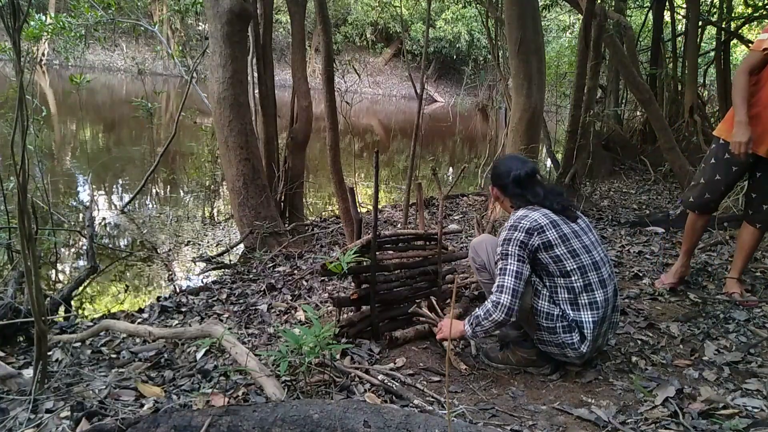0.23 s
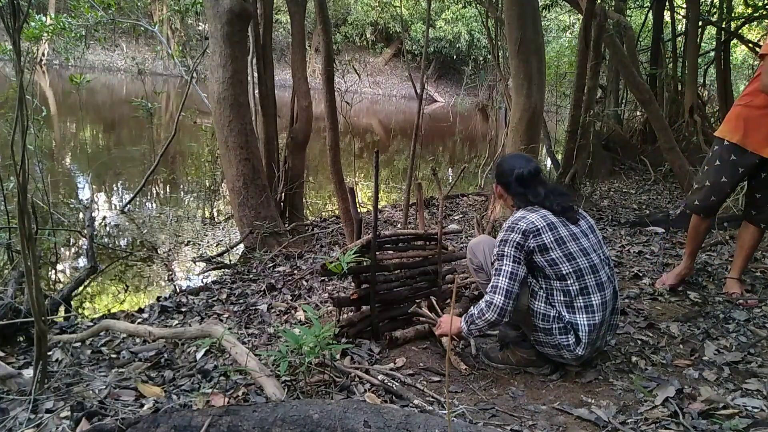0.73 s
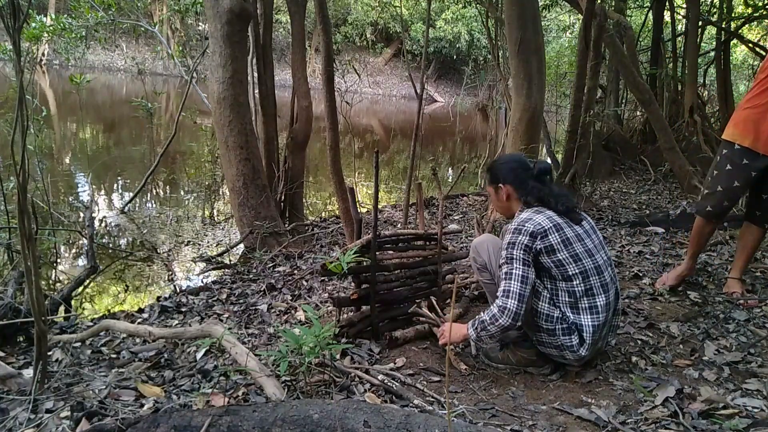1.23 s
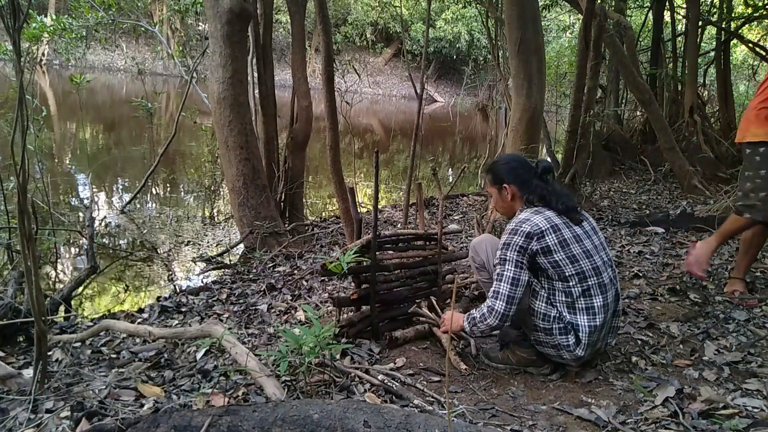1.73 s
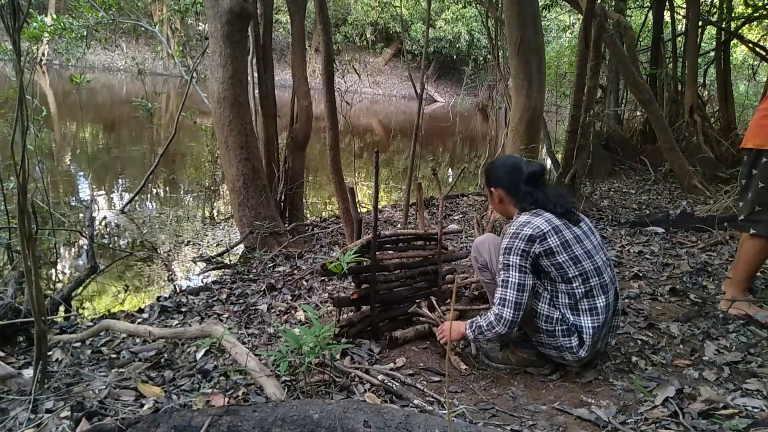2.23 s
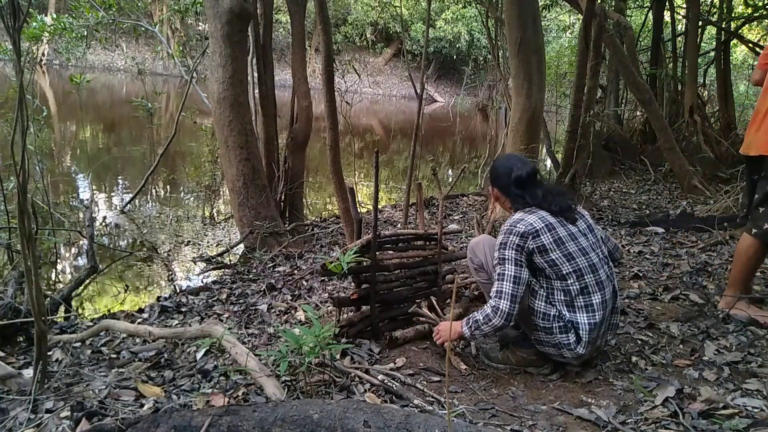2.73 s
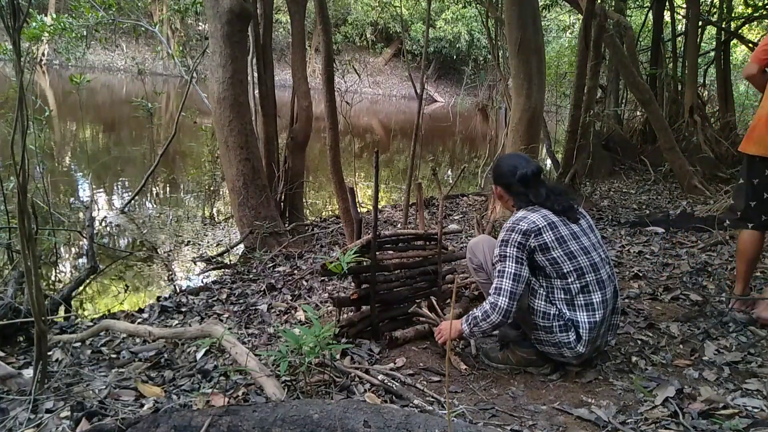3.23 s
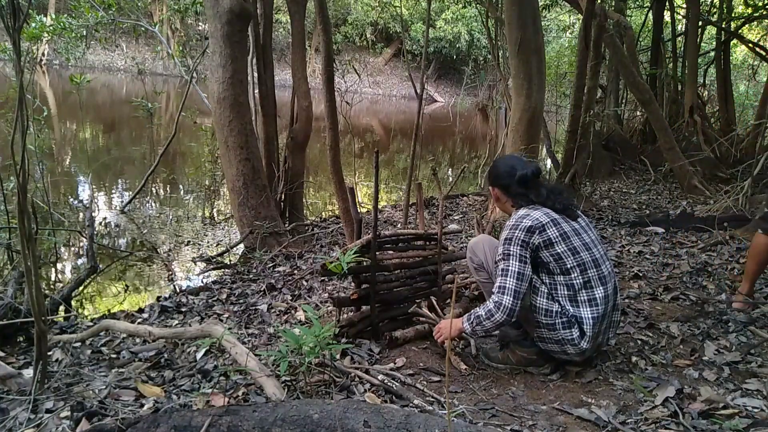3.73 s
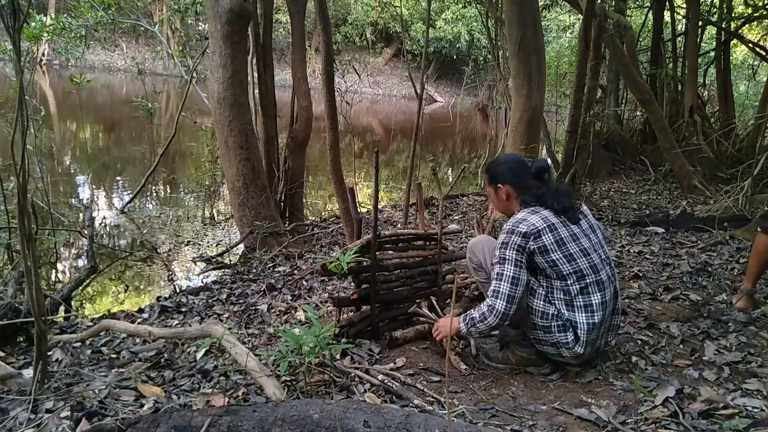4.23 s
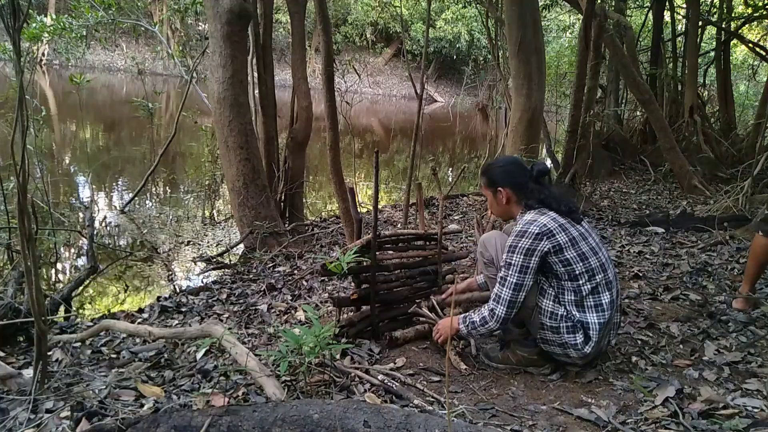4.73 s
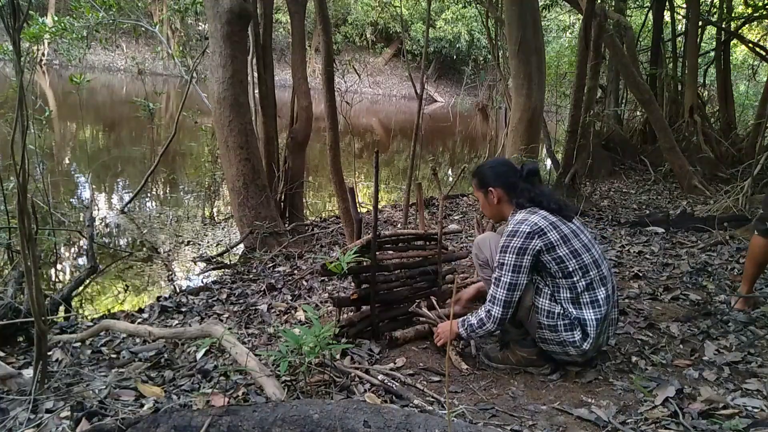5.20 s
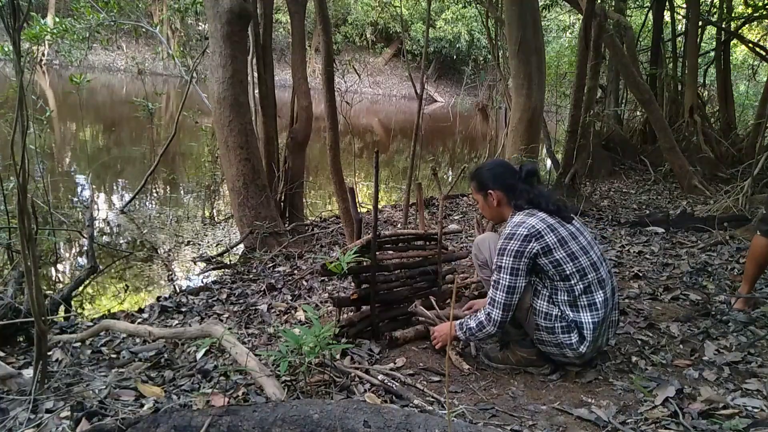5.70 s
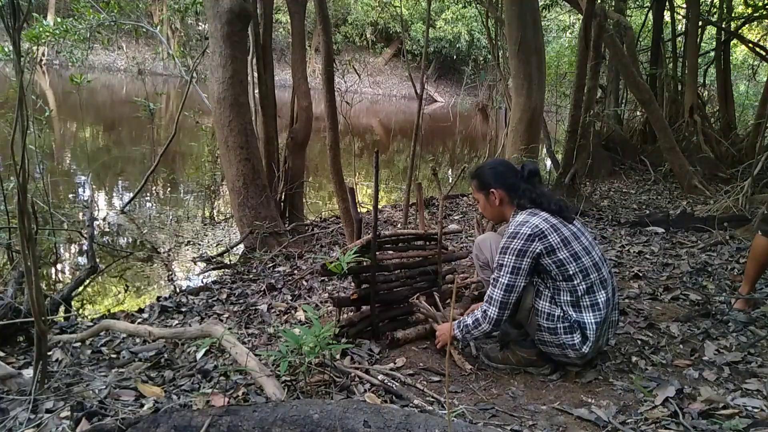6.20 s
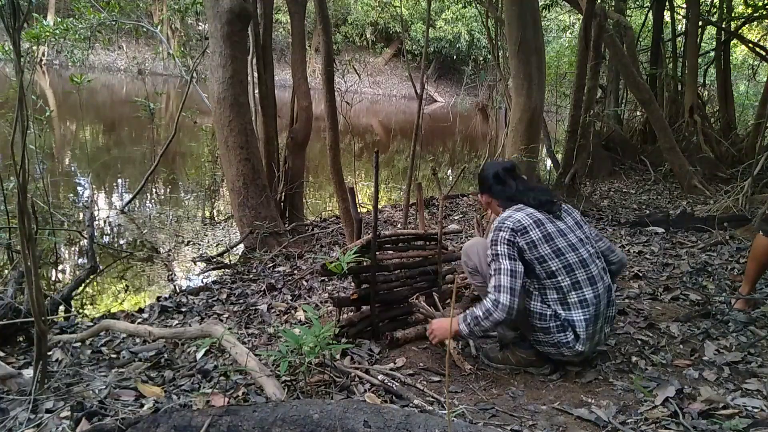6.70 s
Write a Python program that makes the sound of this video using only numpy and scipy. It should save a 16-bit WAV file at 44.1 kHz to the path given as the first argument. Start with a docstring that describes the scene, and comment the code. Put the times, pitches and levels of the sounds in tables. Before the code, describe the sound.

Brittle kindling is broken and pushed through leaf litter, heard close by a small, bright microphone. Dry snaps of uneven strength stand out among tiny clicks, scraping wood and crinkling leaves. Loudest cracks fall just after the middle, then the handling calms into sparse ticks before another snap near the end. The open woodland is quiet, with steady hush, short diffuse echo, a brief high whine early on and weak distant bird notes later.

```python
"""Dry twigs snap on a forest floor: each fracture is an impulse amid a burst of random-sign fibre clicks.
Smaller fractures tick; sticks clack as damped resonances, shake a wood pile and ring in bending modes.
Between them grains of filtered noise scrape wood and rustle dead leaves in strokes.
Behind: air as steady coloured noise, an insect whine and far bird notes as sines of wandering pitch.
Tails of decaying noise stand for the echo among the trunks."""
import sys
import numpy as np
from scipy import signal
from scipy.fft import rfft, irfft, next_fast_len
from scipy.io import wavfile
from scipy.ndimage import map_coordinates

SR = 44100
rng = np.random.default_rng(int(sys.argv[2]) if len(sys.argv) > 2 else 0)


def wav_record(signal):
    """Record a signal, one row per channel, as 16-bit PCM in the file named by sys.argv[1]."""
    frames = np.transpose(np.atleast_2d(signal))
    bounded = np.clip(frames, -1, 1)
    # unit amplitude maps onto the largest positive 16-bit level
    quanta = np.round(bounded * 32767).astype(np.int16)
    wavfile.write(sys.argv[1], SR, quanta)


N = 306495

# Twigs breaking: t/s, level/dB, body level/dB, top treble/dB, tearing time before the break/s, splintering t60/s
TWIG_SNAPS = [(-.012, -31, -24, 0, 0.0013, 0.084), (1.229, -30, -24, -3.5, 0.0009, .016),
              (1.7513, -34, -29, -0.5, 0.0035, 0.04), (1.9322, -20.5, -21.5, 2.5, .0034, 0.053),
              (3.5606, -35.5, -31, 4.5, 0.00072, 0.029), (3.7505, -22, -9, 5.5, 0.00072, 0.014),
              (4.09, -37.5, -15, 10.5, 0.0043, 0.054), (4.2376, -23.5, -24, -4, 0.00061, 0.053),
              (4.3658, -15, -14, 2.5, 0.00029, 0.023), (6.425, -25.5, -22.5, -1.5, 0.0015, 0.091)]
# Twig ends ticking together: t/s, level/dB, body level/dB, top treble/dB, splintering t60/s
TWIG_TICKS = [(.172, -48, -4.5, -7, 0.026), (0.3452, -39.5, -9, -9, .025), (0.4034, -39, -20, -17, .013),
              (0.5172, -43.5, -19, 1, 0.023), (0.5949, -39.5, -20, -1, .012),
              (1.032, -30.5, -24, -7, 0.011), (1.3238, -41, -11, -6, 0.011), (1.8808, -40.5, -35, 4, 0.04),
              (2.133, -41.5, -3, 5, .02), (2.1897, -36, -9, 1, .011), (2.6043, -28.5, -45, -7, 0.02),
              (2.6423, -36, -10.5, -12, 0.033), (2.8078, -40, -7, -26, 0.015),
              (2.9636, -31, -13, -16, 0.0054), (3.144, -43, -11, -13, .015), (3.1739, -43, -15, -13, 0.017),
              (3.2335, -31.5, -13.5, -8, .016), (3.2997, -28, -35, -10.5, 0.015), (3.494, -46, -7, 1, .008),
              (4.0556, -34, -40, -1.5, 0.025), (4.0806, -32, -29, -3, .026),
              (4.4741, -28.5, -20, -10, 0.012), (4.77, -38.5, -17, -20, 0.025),
              (4.8674, -33.5, -19, -24, 0.027), (4.9688, -39, -20, -5.5, 0.03),
              (5.0907, -38.5, -21, -14, .03), (5.1288, -32, -38, -10, .008),
              (5.219, -37.5, -7.5, -3.5, 0.0087), (5.25, -42, -26, -2, 0.012),
              (5.3569, -38.5, -6.5, -7, 0.0085), (5.4458, -35.5, -11, -19, .008),
              (5.94, -49, -24, -2, .016), (6.141, -49, -4.5, -1, 0.073), (6.375, -46, -30, 4.5, 0.055),
              (6.5797, -44, -12.5, -1, .024), (6.6053, -38, -13.5, -16, 0.033),
              (6.712, -44.5, -12, -10, 0.044), (6.8759, -43.5, -15, -14, 0.049)]
# Light sticks bumping: t/s, level/dB, f/Hz, t60/s
STICK_BUMPS = [(.171, -68, 1440, 0.028), (.518, -66.5, 1350, 0.019), (.561, -67, 1560, 0.042),
               (1.753, -60, 990, 0.029), (1.939, -62.5, 1240, 0.2), (1.981, -57, 990, 0.09),
               (2.046, -56.5, 1070, 0.14), (2.08, -61, 840, 0.03), (2.111, -57.5, 1210, 0.081),
               (2.187, -43, 1640, 0.0049), (2.431, -64.5, 1200, 0.1), (3.869, -68, 754, 0.048),
               (4.439, -60, 1580, 0.042), (4.769, -61.5, 1420, .025), (4.971, -65, 1030, 0.021),
               (5.091, -59.5, 1760, 0.044), (5.195, -58, 2000, 0.037), (5.226, -59.5, 950, 0.06),
               (5.809, -69, 965, 0.042)]
# A thick stick landing on the pile and bouncing: t/s, level/dB
PILE_KNOCKS = [(3.3675, -48), (3.379, -46.5)]
# Bending modes of the thick stick: f/Hz, level/dB, t60/s
BENDING_MODES = [(440, 2.5, 0.29), (552, 11.5, 0.098), (620, 1, 0.07), (815, 12, 0.13), (960, -2, 0.13),
                 (1344, 6, 0.077), (1457, 5, 0.055)]
# Far bird notes: t/s, f/Hz, level/dB
BIRD_NOTES = [(4.67, 2477, -66), (4.87, 2430, -63), (5.01, 2590, -63), (5.211, 2310, -65),
              (5.41, 2400, -66.5), (5.595, 2594, -62.5), (5.719, 2490, -62), (5.865, 2520, -63.5)]
# Relative spectra of break, twig body, wood scrape, leaves and air: f/Hz, density/dB per Hz
CRACK_SPECTRUM = [(2000, -30.5), (4800, -15.5), (6500, -6.5), (9000, -2), (12000, -1.5), (16000, 4)]
BODY_SPECTRUM = [(40, -4), (120, 2), (300, 0.5), (650, 0), (1100, -2), (2000, 0.5), (2900, 5), (4500, -2),
                 (8000, -10)]
SCRAPE_SPECTRUM = [(80, -3.5), (300, -8.5), (600, 1.5), (1400, 1), (3000, -6.5), (5000, -14.5),
                   (9000, -19.5)]
LEAF_SPECTRUM = [(1000, -11.5), (3000, -2), (5000, -4), (7500, 1), (10000, -1.5), (16000, 0)]
AIR_SPECTRUM = [(10, 28), (25, 13.5), (60, 7.5), (130, 6), (300, -2), (1000, -4.5), (2500, -8), (5500, -18),
                (7800, -23), (9400, -3), (10400, -15), (16000, -16)]
# Decay of the forest echo: f/Hz, t60/s
FOREST_DECAY = [(200, 0.13), (2500, 0.26), (8000, 0.33), (15000, 0.27)]
# Treble resonances of the microphone: f/Hz, width/Hz, level/dB
MICROPHONE_PEAKS = [(7830, 656, 7.5), (15050, 1100, 5.5)]
# Gain of the side signal: f/Hz, level/dB
SIDE_GAIN = [(3950, -69), (4300, -0.5), (6500, -7.5), (8000, -18), (15000, -10)]
# Resonances of the wood pile: f/Hz, width/Hz, level/dB
PILE_MODES = [(285, 51, -14), (425.5, 23, -6), (735, 160, -8), (1425, 96, -8.5), (2140, 1800, -22.5)]
# Gains of a close, direct sound: one row for mid, one for side
DIRECT_GAINS = [
    [1],
    [.4],
]
# Sticks pushed through litter: t/s of the hardest push, rise/s, fade/s, scraping wood level/dB, leaf level/dB
LITTER_STROKES = [(.31, .04, 0.094, -67, -60.5), (.6, 0.3, 0.24, -74, -63.5), (1.07, 0.18, .4, -72, -65),
                  (1.58, 0.26, 0.52, -65, -65), (2.12, 0.31, 0.19, -58, -50.5),
                  (2.66, 0.46, 0.32, -58, -53), (2.919, 0.16, 0.12, -64.5, -60.5),
                  (3.27, 0.49, 0.85, -63, -59), (3.35, 0.13, 0.11, -52, -47.5),
                  (4.097, 0.052, 0.11, -59, -50), (4.7, 1, 0.87, -66.5, -69.5),
                  (5.07, 0.5, 0.46, -76.5, -61), (5.38, .08, 0.093, -61.5, -62.5),
                  (5.81, 0.24, 0.18, -71, -67.5), (6.17, .05, 0.18, -72.5, -65),
                  (6.63, 0.13, 0.18, -78, -64.5), (6.85, 0.24, 0.2, -86, -66.5)]

TOP_HZ = 15850  # upper band limit
LEAD_S, BREAK_DB = .04, 4  # time kept for tearing before a break; level of the break's single impulse
TICK_TEAR_S = 0.00019  # tearing time before every tick
STRAY_DB, STRAY_SPREAD_DB = 5, 4  # fainter ticks, relative to the stirring of the leaves
# the pile's thud under a 1 kHz stick; lighter, higher sticks shake it less
THUD_DB, THUD_DB_PER_OCTAVE = -11.5, -17
STROKE_RANGE_DB = 17.5  # a stroke gains this much over its rise and loses it over its fade
RESTING_WOOD_DB, RESTING_LEAVES_DB = -78, -78.5  # the litter is never quite still
# bits shower on the leaves after a snap; dB relative to the snap's level
DEBRIS_DB, DEBRIS_RISE_S, DEBRIS_FADE_S = -35.5, 0.009, 0.52
NOTE_S, NOTE_FALL_HZ = .115, 255  # length and fall in pitch of every bird note
WHINE_START_S, WHINE_END_S, WHINE_FADE_S, WHINE_DB = 1.17, 2.0, 0.11, -73
WHINE_HZ, WHINE_SAG_HZ, WHINE_SETTLE_S = 7500, 645, 0.32  # it starts sharp and settles onto WHINE_HZ


def amp(db):
    """Amplitude ratio of a level in dB."""
    return 10 ** (np.asarray(db) / 20)


def unit(x):
    """Normalisation to rms 1."""
    return x / np.sqrt(np.mean(x ** 2) + 1e-20)


def along(points, hz):
    """Interpolation of (f/Hz, value) points on a logarithmic frequency axis."""
    f, value = np.transpose(points)
    return np.interp(np.log(hz + 1), np.log(f), value)


def wobble(rate):
    """A smooth random curve through normal deviates, rate knots a second."""
    knots = rng.standard_normal(int(N * rate / SR) + 4)
    return map_coordinates(knots, [np.arange(N) * rate / SR])


def filtered(x, response):
    """Linear filtering: the spectrum of x times a response of frequency."""
    n = x.shape[-1]
    padded = next_fast_len(n + 2 ** 12)
    spectrum = rfft(x, padded) * response(np.fft.rfftfreq(padded, 1 / SR))
    return irfft(spectrum, padded)[..., :n]


def coloured(x, spectrum):
    """Spectral shaping of x, normalised to rms 1."""
    return unit(filtered(x, lambda hz: amp(along(spectrum, hz))))


def tinted(x, spectrum):
    """Spectral shaping that leaves the power of a white x unchanged."""
    return filtered(x, lambda hz: unit(amp(along(spectrum, hz))))


def resonance(hz, centre_hz, q):
    """Response of one damped mode, about 1 at its centre."""
    return 1 / (1 + 1j * q * (hz / centre_hz - centre_hz / (hz + 1)))


def noise(size):
    """Independent white noise in mid and side."""
    return rng.standard_normal((2, size))


def add(track, s, sound):
    """Superposition of a sound on the track from time s, cut at the track's ends."""
    start = round(s * SR)
    room = track[:, max(start, 0):]
    sound = sound[..., max(-start, 0):]
    room[:, :sound.shape[-1]] += sound[..., :room.shape[-1]]


def forest():
    """Diffuse scattering: trunks and leaves turn a click into a tail, mid energy 1, new at every call."""
    hz, t, bands = signal.stft(noise(SR // 2), SR, nperseg=256)
    decay = amp(-60 * t / along(FOREST_DECAY, hz)[:, None])
    tail = signal.istft(bands * decay, SR, nperseg=256)[1][:, :SR // 2]
    return tail / np.linalg.norm(tail[0])


def echo(x):
    """Reverberation: the mid of a sound convolved with the forest's impulse response."""
    return signal.fftconvolve(x[:1], forest(), axes=1)[:, :x.shape[-1]]


def air():
    """The steady hush of the forest: stationary noise of fixed spectrum."""
    return amp(-63) * coloured(noise(N), AIR_SPECTRUM) * [[1], [.3]]


def insect():
    """Frequency modulation: a thin, unsteady whine whose pitch sinks a little."""
    t = np.arange(N) / SR
    age = np.maximum(t - WHINE_START_S, 0)
    singing = np.clip(np.minimum(age, WHINE_END_S - t) / WHINE_FADE_S, 0, 1)
    hz = WHINE_HZ + WHINE_SAG_HZ * np.exp(-(age / WHINE_SETTLE_S) ** 2)
    whine = np.sin(2 * np.pi * np.cumsum(hz + 150 * wobble(700)) / SR)
    return singing * amp(WHINE_DB + 2.4 * wobble(60)) * whine


def bird():
    """Falling notes, raspy by random frequency modulation and blurred by scattering."""
    out = np.zeros((2, N))
    u = np.linspace(0, 1, int(NOTE_S * SR))
    envelope = np.sqrt(np.abs(np.sin(np.pi * u)))
    for s, hz, db in BIRD_NOTES:
        pitch = hz + NOTE_FALL_HZ * (.5 - u) + 230 * wobble(445.0)[:len(u)]
        note = np.sin(2 * np.pi * np.cumsum(pitch) / SR)
        add(out, s, amp(db) * envelope * note)
    return .45 * out + .8 * echo(out)


def swell(s, rise_s, fade_s):
    """Exponential growth to a gain of 1 at time s and exponential decay after it."""
    t = np.arange(N) / SR - s
    return amp(-STROKE_RANGE_DB * np.minimum(np.maximum(-t / rise_s, t / fade_s), 10))


def stirring():
    """Incoherent addition: gains of wood and leaves, strokes and falling debris summed in power."""
    wood, leaves = amp(RESTING_WOOD_DB) ** 2, amp(RESTING_LEAVES_DB) ** 2
    for s, rise_s, fade_s, wood_db, leaves_db in LITTER_STROKES:
        push = swell(s, rise_s, fade_s)
        wood = wood + (amp(wood_db) * push) ** 2
        leaves = leaves + (amp(leaves_db) * push) ** 2
    for s, db, *_ in TWIG_SNAPS:
        debris = swell(s + DEBRIS_RISE_S, DEBRIS_RISE_S, DEBRIS_FADE_S)
        leaves = leaves + (amp(db + DEBRIS_DB) * debris) ** 2
    return np.sqrt(wood), np.sqrt(leaves)


def grains(rate, spread_db, hiss):
    """Stick-slip friction: tiny slips of varied size, rate a second, over a smooth rub."""
    size = amp(spread_db * np.minimum(rng.exponential(size=N), 3))
    slips = np.sign(noise(N)) * size * (rng.random(N) < rate / SR)
    return unit(slips) + hiss * noise(N)


def shuffle():
    """Friction noise: sticks drag over the ground and dead leaves crinkle under them."""
    wood_gain, leaves_gain = stirring()
    rub = coloured(grains(rate=700, spread_db=2.0, hiss=0.99), SCRAPE_SPECTRUM)
    crinkle = coloured(grains(rate=1400, spread_db=5.0, hiss=1.18), LEAF_SPECTRUM)
    scrape = wood_gain * amp(3.56 * wobble(60)) * rub
    leaves = leaves_gain * amp(2.2 * wobble(58)) * crinkle
    return scrape + leaves


def knocks():
    """Modal vibration: the thick stick rings in its bending modes at each contact."""
    out, t = np.zeros((2, N)), np.arange(SR // 2) / SR
    for s, db in PILE_KNOCKS:
        ring = sum(amp(level - 60 * t / t60) * np.sin(2 * np.pi * hz * t) for hz, level, t60 in BENDING_MODES)
        contact = amp(1.0 - 60 * t / 0.054) * coloured(noise(len(t)), SCRAPE_SPECTRUM)
        add(out, s, amp(db) * (ring + contact))
    # even a thick stick is slender and radiates little bass
    return filtered(out, lambda hz: (1j * hz / (250 + 1j * hz)) ** 3 / np.sqrt(1 + (340 / (hz + 1)) ** 8))


def pile(hz):
    """Modal superposition: the wood pile's response, its modes alternating in sign."""
    return sum((-1) ** k * amp(db) * resonance(hz, centre, centre / width)
               for k, (centre, width, db) in enumerate(PILE_MODES))


def bumps():
    """Coupled resonators: light sticks clack at their own pitch and shake the pile they touch."""
    out, t = np.zeros((2, N)), np.arange(SR // 3) / SR
    for s, db, pitch_hz, t60 in STICK_BUMPS:
        rattle = noise(len(t)) * amp(db - 60 * t / t60)
        clack = filtered(rattle, lambda hz: unit(resonance(hz, pitch_hz, q=2.25) * (pile(hz) + .12)))
        thud_gain = amp(THUD_DB + THUD_DB_PER_OCTAVE * np.log2(pitch_hz / 10 ** 3))
        thud = thud_gain * filtered(rattle, lambda hz: unit(pile(hz) * resonance(hz, 204.4, q=0.5)))
        add(out, s, clack + thud + amp(-9.5) * echo(clack))
    return out


def fracture(body_db, treble_db, tear, t60, echo_db, splinter_db, crack_db):
    """Brittle fracture: fibres tear with growing force, the twig breaks LEAD_S in, splinters spray."""
    lead = round(LEAD_S * SR)
    t = np.arange(-lead, SR // 2) / SR
    knots = t[::32]
    fibres = unit(np.interp(t, knots, amp(2.5 * rng.standard_normal(len(knots)))))
    tearing = np.exp(np.minimum(t, 0) / tear)
    splinters = tearing * amp(splinter_db - 60 * np.maximum(t, 0) / t60) * fibres
    force = amp(crack_db) * (t == 0) + splinters
    tail = amp(echo_db) * np.linalg.norm(force) * np.pad(forest(), ((0, 0), (lead, 0)))
    # the direct sound is weaker in the side than in the mid
    click = force * np.sign(noise(len(t))) * DIRECT_GAINS + tail
    # thin, brittle twigs crack brighter: treble_db comes in from 8.5 to 13 kHz
    crack = filtered(tinted(click, CRACK_SPECTRUM),
                     lambda hz: amp(treble_db * np.clip((hz - 8500) / 4500, 0, 1)))
    return crack + amp(body_db) * tinted(click, BODY_SPECTRUM)


def tick(body_db, treble_db, t60):
    """Fracture in miniature: a few fibres give way where two twigs touch."""
    return fracture(body_db, treble_db, TICK_TEAR_S, t60, echo_db=-4.5, splinter_db=-5.0, crack_db=BREAK_DB)


def stray_ticks(count):
    """Random micro-fractures: one faint tick in each equal span, scaled by the stirring of the leaves."""
    out, leaves = np.zeros((2, N)), stirring()[1]
    moments = (np.arange(count) + rng.random(count)) / count * (N - 1) / SR
    for s, (size, body, treble) in zip(moments, rng.standard_normal((count, 3))):
        gain = leaves[int(s * SR)] * amp(STRAY_DB + STRAY_SPREAD_DB * size)
        sound = tick(body_db=-8.5 + 1.9 * body, treble_db=-6 + 4 * treble, t60=0.019)
        add(out, s - LEAD_S, gain * sound)
    return out


def twigs():
    """Fractures at two scales: loud snaps and the small ticks of handling."""
    out = np.zeros((2, N))
    for s, db, body_db, treble_db, tear, t60 in TWIG_SNAPS:
        snap = fracture(body_db, treble_db, tear, t60, echo_db=-3.0, splinter_db=-9.0, crack_db=BREAK_DB)
        add(out, s - LEAD_S, amp(db) * snap)
    for s, db, body_db, treble_db, t60 in TWIG_TICKS:
        add(out, s - LEAD_S, amp(db) * tick(body_db, treble_db, t60))
    return out


def scene():
    """Mid-side superposition: all layers are summed, SIDE_GAIN filters the side, the insect is in the middle."""
    background = air() + bird()
    handling = shuffle() * [[1], [.7]] + knocks() + bumps()
    mid, side = background + handling + stray_ticks(count=30) + twigs()
    mid = mid + insect()
    side = filtered(side, lambda hz: amp(along(SIDE_GAIN, hz)))
    return np.array([mid + side, mid - side])


def record(dry):
    """Transducer response: a small microphone with two treble resonances and a band limit."""
    def colour(hz):
        return amp(sum(db * np.exp(-((hz - centre) / width) ** 2 / 2) for centre, width, db in MICROPHONE_PEAKS))

    def limit(hz):
        return 1 / np.sqrt(1 + (hz / TOP_HZ) ** 200)

    return filtered(dry, lambda hz: colour(hz) * limit(hz))


dry = scene()
out = record(dry)
wav_record(out)
```